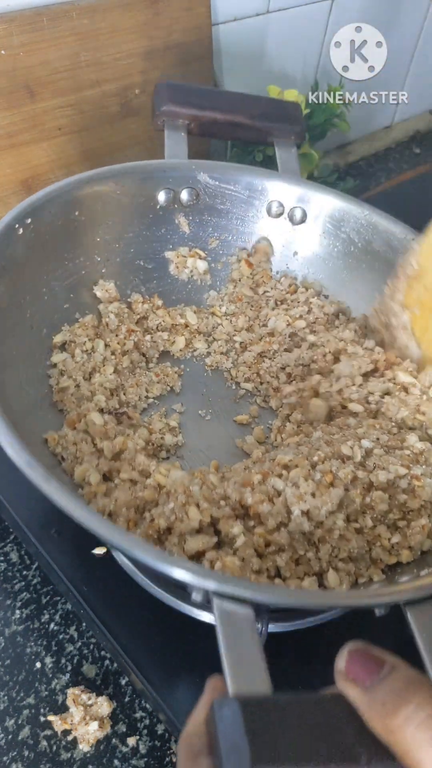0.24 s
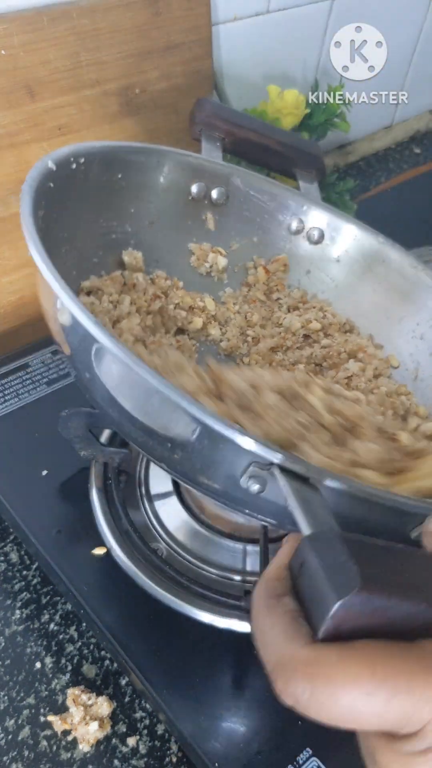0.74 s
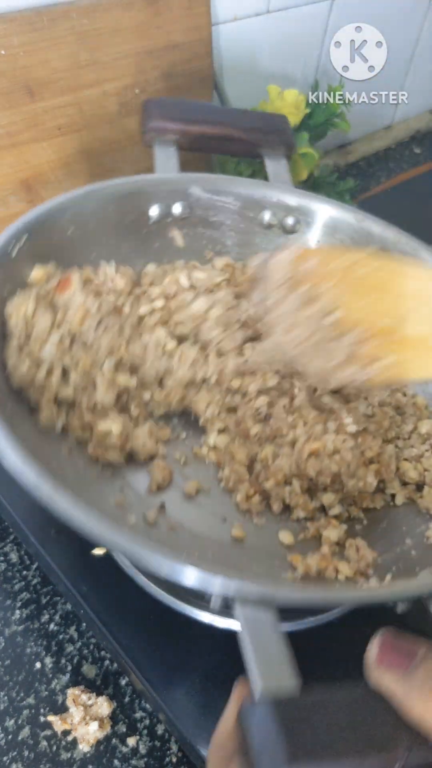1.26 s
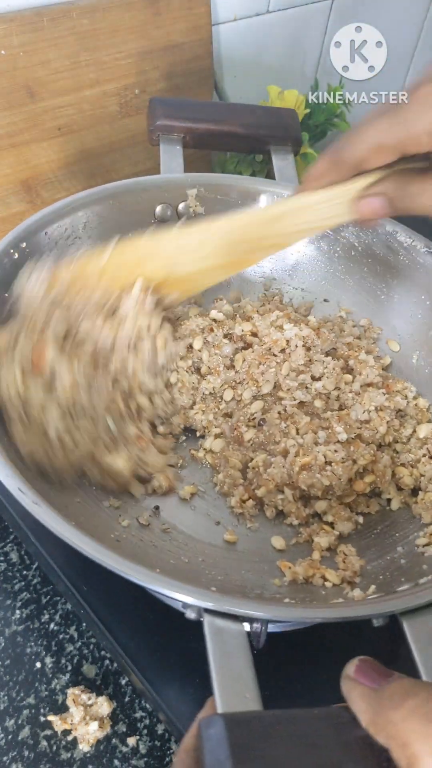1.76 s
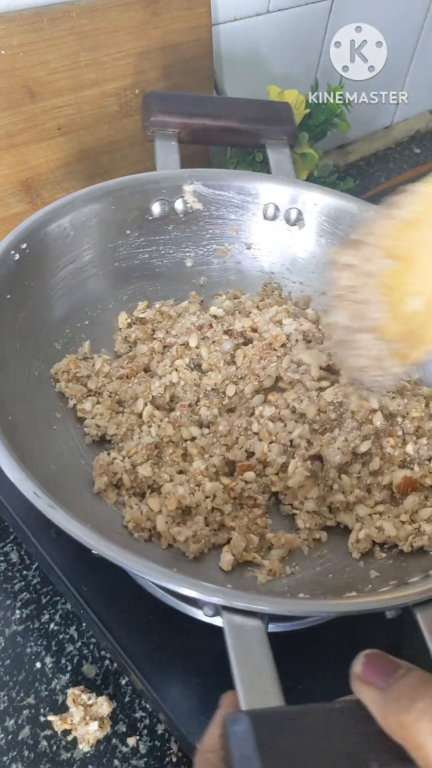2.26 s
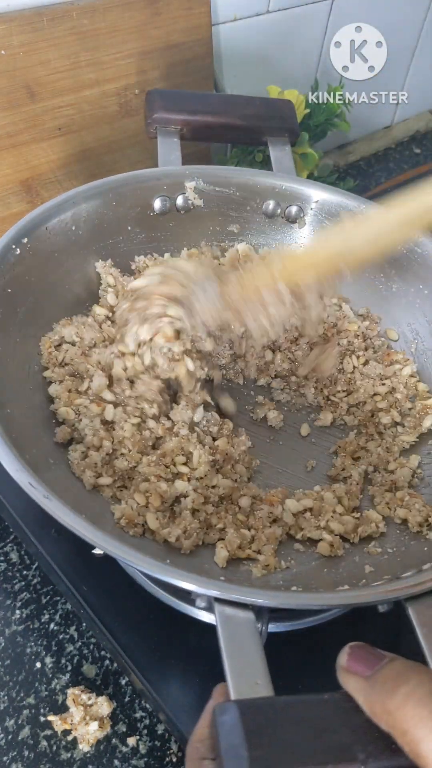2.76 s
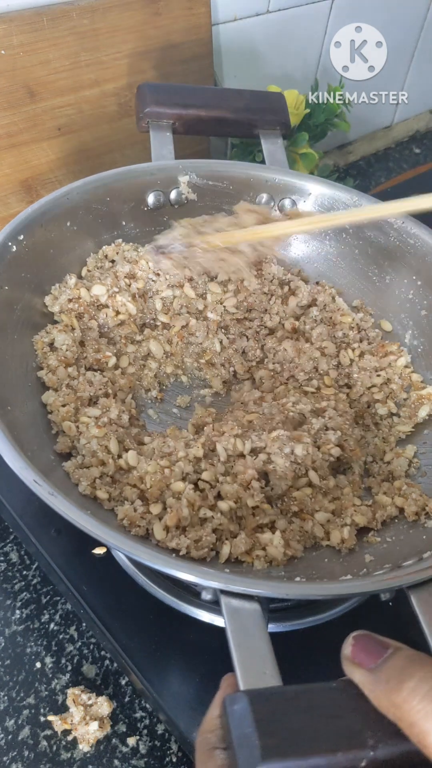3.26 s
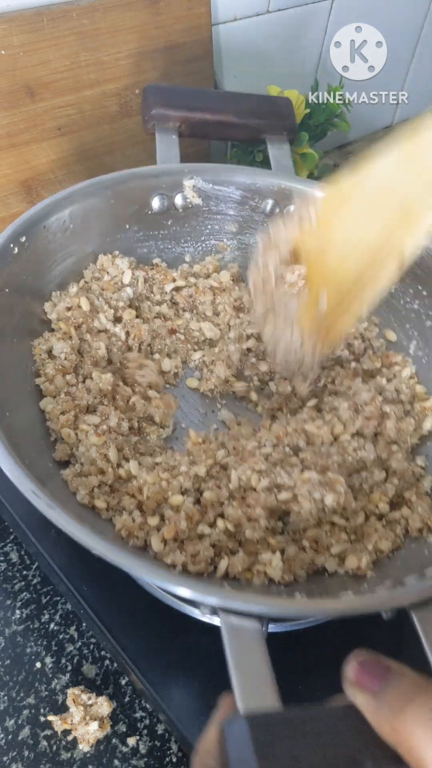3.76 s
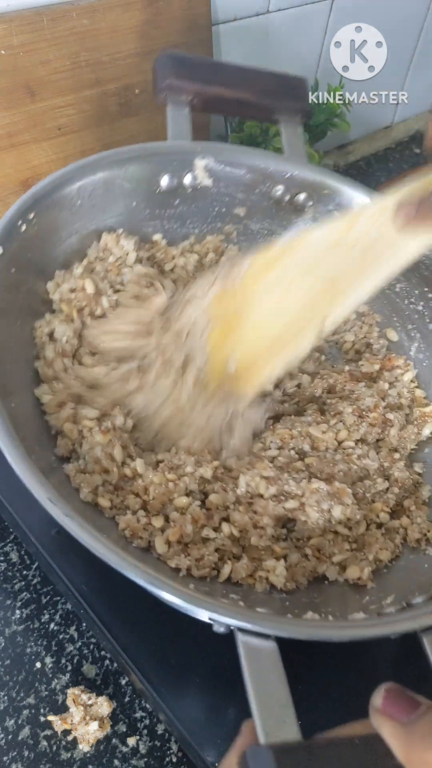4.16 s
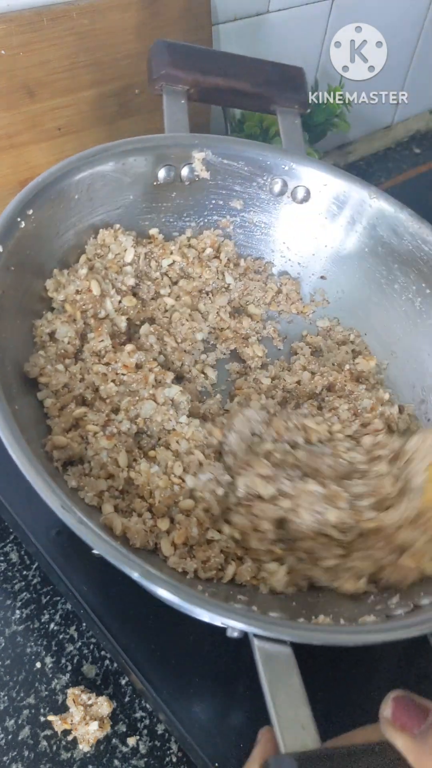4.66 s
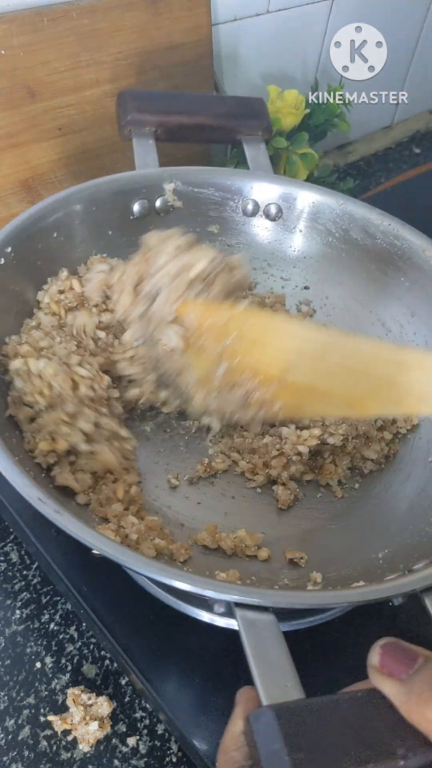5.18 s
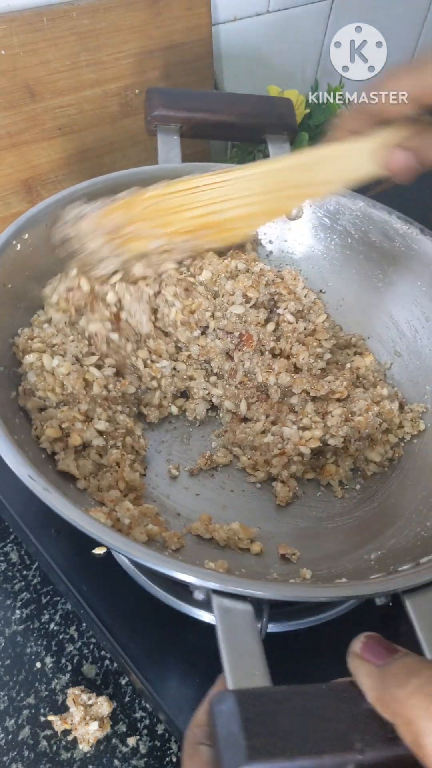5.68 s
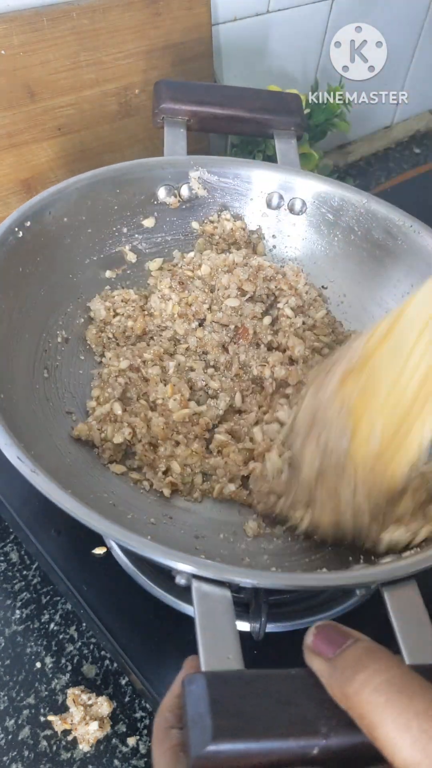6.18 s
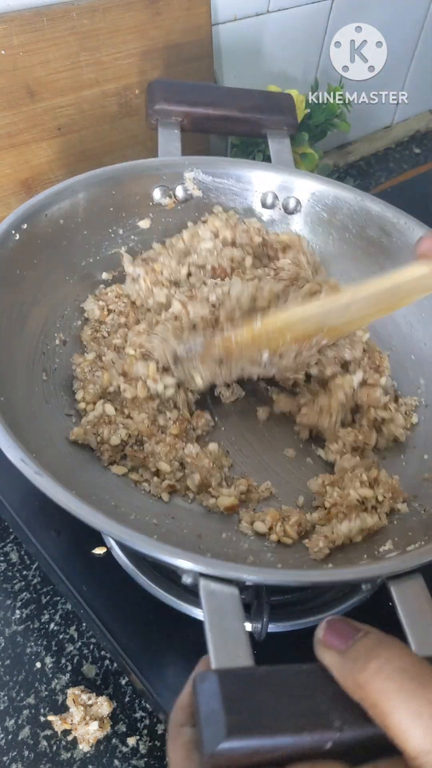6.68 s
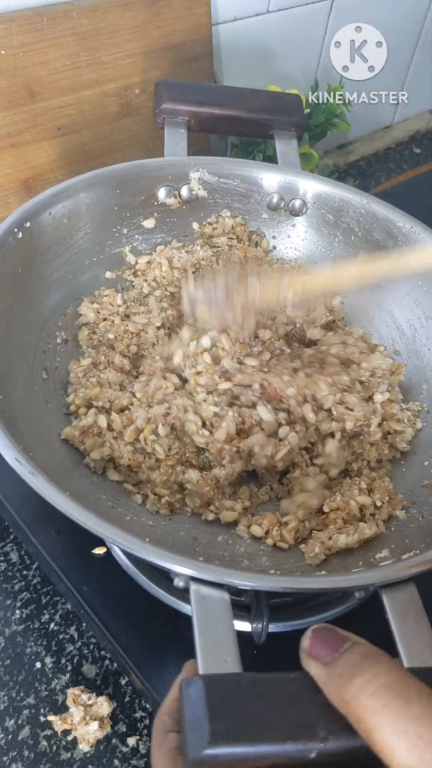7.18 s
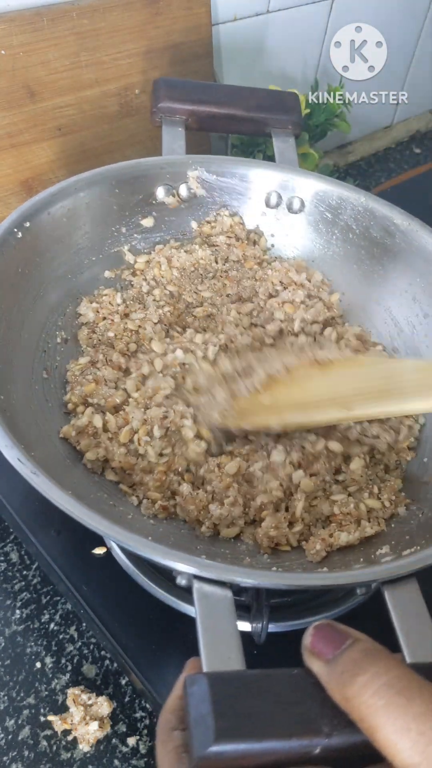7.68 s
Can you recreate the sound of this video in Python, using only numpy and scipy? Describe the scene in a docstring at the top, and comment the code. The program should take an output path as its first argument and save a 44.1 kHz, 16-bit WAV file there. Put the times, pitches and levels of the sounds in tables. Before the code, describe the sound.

A wooden spatula stirs a crumbly, sticky mixture in a steel pan, scraping and knocking as the pan clanks on the stove.

```python
"""Crumbs rustle and tick as a wooden spatula stirs a sticky mixture in a steel pan on a gas stove.
The pan clanks and rings on the burner grate, and the mixture tumbles once in a low patter.
The blade knocks, rocks the pan, sticks and squeaks on bare steel, and thumps once into the food.
Every stroke is a swarm of tiny contacts. A small tiled kitchen adds short echoes and a soft murmur."""
import sys
import numpy as np
from scipy import signal
from scipy.fft import rfft, irfft, next_fast_len
from scipy.io import wavfile
from scipy.ndimage import map_coordinates

SR = 44100
rng = np.random.default_rng(int(sys.argv[2]) if len(sys.argv) > 2 else 0)


def transcribe(signal):
    """Save signal, clipped to [-1, 1], as a 16-bit WAV file at the path in sys.argv[1]."""
    frames = np.atleast_2d(signal).T
    limited = np.clip(frames, -1, 1)
    pcm = np.round(limited * 32767).astype(np.int16)
    wavfile.write(sys.argv[1], SR, pcm)


N = 350154

# Blade strokes. Each row: start, speed-up and slow-down in seconds, crumb level and drag level in dB.
STROKES = [(0, 0.018, .08, -59, -47), (.04, .06, 0.037, -57, -46.5), (.1, 0.12, 0.34, -53, -78),
           (.35, 0.04, 0.28, -51, -63), (.64, 0.27, 0.13, -50.5, -60.5), (1.0, .15, 0.24, -55, -57.5),
           (1.6, 0.13, 0.21, -49.5, -67), (1.885, 0.08, 0.21, -47.5, -59), (2.029, 0.081, 0.14, -47, -58.5),
           (2.539, 0.078, 0.143, -46.5, -49.5), (2.99, 0.095, .04, -52, -55), (3.07, 0.096, 0.14, -46, -55),
           (3.23, 0.036, 0.2, -65, -51), (3.4, 0.075, .03, -55, -57), (3.48, 0.088, .19, -45, -44.5),
           (3.95, .05, 0.018, -61.5, -60), (4.122, 0.12, 0.08, -43, -48.5),
           (4.61, 0.061, 0.2, -50.5, -58.5), (4.819, 0.07, 0.16, -45.5, -52.5),
           (5.14, .12, 0.22, -57.5, -65), (5.625, 0.052, 0.79, -53, -62), (5.919, 0.18, 0.19, -46, -52.5),
           (6.29, 0.096, .01, -59, -53), (6.45, 0.034, 0.039, -66, -66.5), (6.62, .07, 0.11, -46, -47.5),
           (6.7, 0.11, 0.042, -45.5, -41), (7.06, .12, 0.09, -48.5, -51), (7.4, 0.036, .06, -49.5, -59),
           (7.545, 0.019, 0.06, -52.5, -72), (7.754, 0.021, 0.043, -46.5, -47),
           (7.79, 0.031, 0.23, -52, -49.5)]
# Blade edge and hard crumbs on steel. Each row: start in seconds, crack level and ring level in dB,
# favoured pitch in Hz.
TICKS = [(0.0461, -27.5, -29, 15300), (0.0589, -27.5, -29.5, 9100), (0.8236, -31, -44.5, 15330),
         (1.1622, -37, -50.5, 11300), (1.906, -42, -47, 15500), (2.4154, -28.5, -45.5, 15200),
         (2.831, -44, -52, 3720), (2.9876, -45.5, -59, 11300), (3.0858, -32.5, -42.5, 11200),
         (3.255, -32, -60, 11300), (3.5049, -30, -38.5, 11200), (3.6113, -31, -56, 11250),
         (3.7921, -35.5, -52.5, 3720), (3.8753, -42, -43, 11300), (4.5402, -28, -55, 8000),
         (4.999, -47, -51.5, 11300), (5.9818, -37, -50.5, 11300), (6.762, -35, -39.5, 15330),
         (7.1725, -19.5, -36.5, 11300), (7.4178, -39, -55, 8050), (7.4622, -29.5, -47, 11300)]
# Crumbs snapping. Each row: start in seconds, level in dB, pitch in Hz.
SNAPS = [(.047, -27, 9000), (.059, -25.5, 8950), (.824, -40, 2210), (2.326, -48, 3200),
         (2.416, -43.5, 8000), (2.842, -44, 6900), (5.239, -37.5, 4900), (5.259, -42, 3200),
         (6.383, -46.5, 11900), (7.043, -47, 4500), (7.608, -38, 7450), (7.616, -36, 5760)]
# Pan on grate. Each row: start in seconds, level in dB, then boom (bass), body (low mids) and
# edge (treble) in dB against that level, strongest note in Hz.
CLANKS = [(.428, -26.5, -27.5, -13.5, -7, 1135), (.44, -31.5, -23.5, -5.5, 0.5, 143),
          (1.457, -18, -24, -12, 0.5, 2600), (1.472, -25.5, -12.5, -5, 0.5, 356),
          (1.578, -34, -13, -3, -10.5, 755), (3.606, -43.5, 1.5, -12, -2, 1020)]
# Blade on pan. Each row: start in seconds, level in dB, body and edge in dB against it, note in Hz.
KNOCKS = [(1.711, -39.5, 0.5, -24.5, 684), (1.732, -36, -1.5, -41, 940), (2.326, -44, -11, -23, 1290),
          (2.338, -47, -17, -25, 676), (2.445, -35.5, -2, -9, 840), (2.448, -38.5, -5, -15, 2540),
          (2.645, -49.5, 2, -12, 473), (3.086, -47, -9, 3.5, 945), (3.496, -44.5, -19, -4, 880),
          (3.517, -38, -10, -19, 664), (3.622, -33, -9.5, -20, 960), (3.675, -43, -1, -13, 555),
          (3.873, -39, -6, -6.5, 2100), (3.877, -42, -4.5, -12, 514), (4.228, -36, -17, 0, 2780),
          (4.26, -44.5, -3.5, -5, 1420), (4.54, -45, 4, -11.5, 215), (4.841, -36.5, -4.5, -21.5, 554),
          (4.843, -41, -13, -22, 1220), (5.29, -34, -3, -19, 710), (5.294, -25, -4, -4, 846),
          (6.784, -44.5, -2, -1, 1130), (6.801, -39, -3.5, -5, 1130), (6.92, -46.5, -13, -29.5, 764),
          (6.963, -41, -6, -35, 950), (7.062, -47.5, -7, -0.5, 1480), (7.103, -40.5, -7, -17, 734),
          (7.133, -37, -8, -12, 603), (7.22, -32.5, -8, -16, 906), (7.445, -44.5, -13, -2, 1390)]
# Pushes that tip the pan. Each row: start in seconds, level in dB.
ROCKS = [(2.646, -55), (4.929, -49.5), (5.296, -39.5), (6.965, -53), (7.1, -56), (7.22, -46.5),
         (7.446, -50.5)]
# Blade squeaks. Each row: start and length in seconds, first and last pitch in Hz, level in dB.
SQUEAKS = [(2.848, 0.02, 1520, 1440, -46.5), (3.313, 0.13, 1095, 1040, -56),
           (3.35, 0.164, 2160, 2000, -60.5), (3.788, 0.018, 3790, 3580, -46),
           (4.222, 0.052, 2850, 2806, -37.5), (4.234, 0.083, 1440, 1414, -44.5)]

# Ringing modes. Each row: pitch in Hz, relative level in dB, time to fade 60 dB in seconds.
STEEL_MODES = [(2690, -19.5, 0.094), (3500, -28, 0.12), (4950, -14.5, 0.12), (7020, -8.5, 0.05),
               (7830, -10.5, 0.15), (9200, -5, 0.077), (11030, -8, 0.089), (11480, -6.5, 0.13),
               (14700, -7, 0.11)]  # thin and high
PAN_MODES = [(87.2, 7.5, 0.83), (139.9, -0.5, 0.5), (345, -7, 0.5), (394, -11, 0.26), (469, -4, 0.44),
             (578, -15.5, 0.48), (688.6, -10.5, 0.44), (786, -10, 0.45), (905, -12, 0.22), (1137, -7, 0.32),
             (1339, -12, 0.31), (1524, -8.5, 0.27), (1614, -11.5, 0.3), (1670, -24, 0.35), (2077, -9, 0.28),
             (2227, -17.5, 0.49), (2603, -9.5, 0.16), (2810, -10, 0.25), (4880, -9.5, 0.21),
             (6110, -12, 0.3)]  # pan and stove together
# Tone colours for noise. Each row: frequency in Hz, relative level in dB.
AIR_EQ = [(15, -43.5), (25, -29.5), (97, 1.5), (277, -12.5), (344, -1), (796, -11), (1190, -15.5),
          (1480, -12), (1650, -24.5), (2480, -21), (3080, -25.5), (7110, -26), (12500, -37), (14800, -39),
          (16000, -33.5)]
CRUMB_EQ = [(500, -30.5), (1200, -1.5), (2400, 0), (3500, -0.5), (5500, -1.5), (8000, -3), (11000, -6.5),
            (15500, -13)]
DRAG_EQ = [(120, -32.5), (260, 8), (500, 1.5), (900, 5), (1500, -5), (2500, -3.5), (5000, -26.5)]
TICK_EQ = [(400, -3), (2000, 0), (4000, 8), (8500, 7.5), (13000, -2.5), (16000, -6.5)]
CLATTER_EQ = [(55, -22.5), (85, 14), (150, 2), (195, -13.5), (250, 6), (620, 2.5), (800, 3.5), (1400, 2),
              (2600, -4), (3400, -9), (4600, -10.5), (7000, -15.5), (16000, -27)]
TUMBLE_EQ = [(30, -37), (80, -2), (150, -6.5), (260, -6), (450, -11.5), (900, -32), (2500, -57.5)]
# The tail of a blow. Each row: frequency in Hz, time to fade 60 dB in seconds.
CLATTER_T60 = [(90, .5), (350, 0.43), (900, 0.37), (2000, 0.42), (5000, 0.28), (14000, 0.35)]
# Stereo width. Each row: frequency in Hz, likeness of left and right from 0 (unrelated) to 1 (same).
STEREO_LIKENESS = [(60, 1), (130, 0.85), (290, 0.75), (640, 0.59), (1410, 0), (3100, 0)]
# Stereo placement. Each row: frequency in Hz, right over left in dB.
STIR_SIDE = [(100, 3.5), (400, 3.5), (1300, 3.5), (4400, 5), (8100, 8), (15000, 12.5)]
CLANK_SIDE = [(100, 1.5), (700, 4), (1500, 0.5), (4400, 3.5), (9000, 5)]
KNOCK_SIDE = [(100, 4), (300, 2), (700, 4.5), (1500, 2), (4400, 3), (9000, 6.5)]


def amp(db):
    """Decibels to gain."""
    return 10 ** (np.asarray(db) / 20)


def unit(x):
    """Scale to rms 1."""
    return x / np.sqrt(np.mean(x ** 2) + 1e-20)


def along(points, hz):
    """Read (Hz, value) points on a log frequency axis."""
    freqs, values = np.transpose(points)
    return np.interp(np.log(hz + 1), np.log(freqs + 1), values)


def wobble(rate):
    """A smooth random curve, rate knots a second."""
    return map_coordinates(rng.standard_normal(int(N * rate / SR) + 4), [np.arange(N) * rate / SR])


def add(track, s, sound):
    """Mix a sound into the track at s seconds."""
    part = track[:, max(round(s * SR), 0):][:, :sound.shape[1]]
    part += sound[:, :part.shape[1]]


def spread(pair, eq, side):
    """Colour two unrelated signals and place them in stereo: bass narrow, treble wide, rms 1."""
    n = pair.shape[1]
    size = next_fast_len(n)
    hz = np.fft.rfftfreq(size, 1 / SR)
    a, b = rfft(pair, size) * amp(along(eq, hz))
    width = np.arccos(along(STEREO_LIKENESS, hz)) / 2
    centre, wide = a * np.cos(width), b * np.sin(width)
    lean = amp(along(side, hz) / 2)
    return unit(irfft(np.array([(centre + wide) / lean, (centre - wide) * lean]), size)[:, :n])


def grains(rate, scatter_db):
    """Two streams of tiny random contacts of uneven size, each about rate a second."""
    size = amp(scatter_db * np.clip(rng.standard_normal((2, N)), -2, 2)) * rng.uniform(-1.08, 1, (2, N))
    return size * (rng.random((2, N)) < rate / SR)


def gesture(rise_s, fall_s, swell_db, bite_s=0.025, lift_db_per_s=151):
    """Gain of one movement: it bites in, swells to its fastest moment, slows and dies away."""
    t = np.arange(SR) / SR
    slowness = np.interp(t, [0, rise_s, rise_s + fall_s], [1, 0, 1])
    lifted_s = np.maximum(t - rise_s - fall_s, 0)
    return np.clip(t / bite_s, 0, 1) * amp(-swell_db * slowness - lift_db_per_s * lifted_s)[None]


def echo(x, t60):
    """A short diffuse answer from tiles or pan walls, different left and right."""
    t = np.arange(SR // 3) / SR
    tail = rng.standard_normal((2, len(t))) * amp(-60 * t / t60)
    return signal.fftconvolve(x, tail / np.linalg.norm(tail[0]), axes=1)[:, :N]


def ring(modes, t, side, scatter_db, blur_hz):
    """Decaying modes, at new strengths for every blow and blurred by the food; high ones sound wide."""
    out = np.zeros((2, len(t)))
    for hz, db, t60 in modes:
        stereo_phase = np.arccos(along(STEREO_LIKENESS, hz)) * rng.standard_normal((2, 1)) * 0.81
        lean = amp(along(side, hz) / 2 * np.array([[-1], [1]]))
        drift = np.cumsum(rng.standard_normal(len(t))) * np.sqrt(2 * np.pi * blur_hz / SR)
        phase = 2 * np.pi * (hz * t + rng.random()) + stereo_phase + drift
        out += lean * amp(db + scatter_db * rng.standard_normal() - 60 * t / t60) * np.sin(phase)
    return out


def hollow(pitch_hz, t60, sharpness, side):
    """The broad note that a blow favours: a decaying band of noise, narrower as sharpness rises."""
    t = np.arange(SR // 3) / SR
    hz = pitch_hz * np.geomspace(1 / 16, 16, 161)
    detune = sharpness * (hz / pitch_hz - pitch_hz / hz) / 2
    hump = np.column_stack([hz, -20 * np.log10(1 + detune ** 2)])
    note = spread(rng.standard_normal((2, len(t))), hump, side)
    return note * amp(-60 * t / t60) * (1 - np.exp(-t * pitch_hz))


def room_tone(level_db=-57):
    """The steady low murmur of the kitchen's air."""
    gain = amp(level_db + 0.29 * wobble(12))
    return gain * spread(rng.standard_normal((2, N)), AIR_EQ, side=[(100, 2.1), (8000, 5.8)])


def stirring(crumb_rest_db=-73.5, drag_rest_db=-65.5):
    """Crumbs rustle ahead of the blade while the wood drags over the steel in tiny slips."""
    rustle_power = np.full((1, N), amp(crumb_rest_db) ** 2)
    drag_power = np.full((1, N), amp(drag_rest_db) ** 2)
    for s, rise_s, fall_s, crumb_db, drag_db in STROKES:
        add(rustle_power, s, (amp(crumb_db) * gesture(rise_s, fall_s, swell_db=9)) ** 2)
        add(drag_power, s, (amp(drag_db) * gesture(rise_s, fall_s, swell_db=13.5)) ** 2)
    pressure = wobble(28)
    crumbs = grains(rate=5000, scatter_db=4.5)
    # each contact rings briefly in the bowl, with a colour that changes as the blade travels
    nearness = np.array([wobble(9) for spot in range(6)])
    nearness /= np.linalg.norm(nearness, axis=0)
    bowl = sum(share * echo(crumbs, t60=0.066) for share in nearness)
    rustle = amp(-0.4 * pressure) * spread(crumbs + amp(-1) * bowl, CRUMB_EQ, STIR_SIDE)
    drag = amp(1.8 * pressure) * spread(grains(rate=2500, scatter_db=3.5), DRAG_EQ, STIR_SIDE)
    return np.sqrt(rustle_power) * rustle + np.sqrt(drag_power) * drag


def ticks(crack_t60=0.051, tail_t60=0.42, favour_db=7, attack_s=0.00041):
    """Small hard contacts: a gritty crack, its echo off the tiles and the high, damped ring of steel."""
    out, t = np.zeros((2, N)), np.arange(SR // 4) / SR
    fade = amp(-12 - 60 * t / crack_t60) + amp(-20 - 60 * t / tail_t60)
    for s, crack_db, ring_db, pitch_hz in TICKS:
        crack = amp(crack_db) * fade * spread(rng.standard_normal((2, len(t))), TICK_EQ, STIR_SIDE)
        modes = [(hz, db + favour_db * np.exp(-(10 * np.log(hz / pitch_hz)) ** 2), t60)
                 for hz, db, t60 in STEEL_MODES]
        shimmer = amp(ring_db) * ring(modes, t, STIR_SIDE, scatter_db=2, blur_hz=260)
        add(out, s, (crack + shimmer) * (1 - np.exp(-t / attack_s)))
    return out


def snaps():
    """Tiny dry clicks of the sticky mixture, with a little echo off the tiles."""
    out = np.zeros((2, N))
    for s, db, pitch_hz in SNAPS:
        add(out, s, amp(db) * hollow(pitch_hz, t60=0.024, sharpness=3.4, side=STIR_SIDE))
    return out + amp(-9) * echo(out, t60=0.2)


def blow(boom, body, edge, side, burst_db, burst_t60, tail_db, modes_db, attack_s):
    """One hit on the pan: a dense burst, the kitchen's echo and the ring of pan and stove."""
    t = np.arange(SR * 4 // 5) / SR
    octave = np.log2(np.fft.rfftfreq(len(t), 1 / SR) + 1)
    force_eq = [(44, boom - 30), (88, boom - 1), (176, body - 8), (350, body), (700, -2.5),
                (1400, -3), (2800, edge / 2 - 2.5), (5600, edge), (11200, edge - 6)]
    clatter = rfft(spread(rng.standard_normal((2, len(t))), CLATTER_EQ, side))
    out = np.zeros((2, len(t)))
    for hz in np.geomspace(44, 11264, 9):  # octave bands
        window = np.sqrt(np.clip(1 - abs(octave - np.log2(hz)), 0, 1))
        band = unit(irfft(clatter * window, len(t)))
        fade = amp(tail_db - 60 * t / along(CLATTER_T60, hz)) + amp(burst_db - 60 * t / burst_t60)
        swell = 1 - np.exp(-t / (attack_s + 0.5 / hz))  # low bands take longer to build up
        out += amp(along(force_eq, hz)) * band * fade * swell
    modes = [(hz, db + along(force_eq, hz), t60) for hz, db, t60 in PAN_MODES]
    ringing = ring(modes, t, side, scatter_db=2, blur_hz=1.2) * (1 - np.exp(-t / 0.008))
    return out + amp(modes_db) * ringing


def clanks():
    """The steel pan meets the iron grate: hard, bright and ringing."""
    out = np.zeros((2, N))
    for s, db, boom, body, edge, note_hz in CLANKS:
        hit = blow(boom, body, edge, CLANK_SIDE,
                   burst_db=-7, burst_t60=0.075, tail_db=-4, modes_db=0.5, attack_s=0.00068)
        note = hollow(note_hz, t60=along(CLATTER_T60, note_hz), sharpness=11, side=CLANK_SIDE)
        add(out, s, amp(db) * hit)
        add(out, s, amp(db - 5) * note)
    return out


def tumble(start_s=0.96, level_db=-44.5):
    """Soft clumps fall back once on the floor of the lifted pan in a low, dense patter."""
    gain = np.zeros((1, N))
    add(gain, start_s, amp(level_db) * gesture(rise_s=0.19, fall_s=0.21, swell_db=13.5))
    return gain * spread(grains(rate=2500, scatter_db=1.5), TUMBLE_EQ, STIR_SIDE)


def knocks():
    """Wood meets the loaded pan: a short blow with a hollow note that starts as a broad slap."""
    out = np.zeros((2, N))
    for s, db, body, edge, note_hz in KNOCKS:
        boom = body - 15.5  # a heavier knock rocks the pan harder on its grate
        hit = blow(boom, body, edge, KNOCK_SIDE,
                   burst_db=-6, burst_t60=0.036, tail_db=-7.5, modes_db=-2, attack_s=0.00047)
        note = hollow(note_hz, t60=0.15, sharpness=14.6, side=KNOCK_SIDE)
        slap = hollow(note_hz, t60=0.028, sharpness=4.6, side=KNOCK_SIDE)
        add(out, s, amp(db) * hit)
        add(out, s, amp(db + 1) * note + amp(db - 1) * slap)
    return out


def rocking(attack_s=0.0089):
    """The blade tips the pan softly on its grate: the two lowest modes hum without a clack."""
    out, t = np.zeros((2, N)), np.arange(SR) / SR
    lowest = [(hz, db - PAN_MODES[0][1], t60) for hz, db, t60 in PAN_MODES[:2]]
    for s, db in ROCKS:
        hum = ring(lowest, t, KNOCK_SIDE, scatter_db=1.5, blur_hz=1)
        add(out, s, amp(db) * hum * (1 - np.exp(-t / attack_s)))
    return out


def squeaks(jitter=0.015):
    """The blade sticks and slips on bare steel: brief, unsteady falling tones with kitchen echo."""
    out, waver = np.zeros((2, N)), wobble(250)
    lean_right = amp([[-2], [2]])
    for s, length_s, start_hz, end_hz, db in SQUEAKS:
        progress = np.linspace(0, 1, int(length_s * SR))
        glide_hz = start_hz + (end_hz - start_hz) * progress
        hz = glide_hz * (1 + jitter * waver[int(s * SR):][:len(progress)])
        tone = np.sin(2 * np.pi * np.cumsum(hz) / SR)
        add(out, s, amp(db) * np.sin(np.pi * progress) * tone * lean_right)
    return out + amp(-6) * echo(out, t60=0.38)


def thump(start_s=4.9, level_db=-35.5):
    """The blade lands flat on the cushion of food: one low, dull push."""
    out = np.zeros((2, N))
    add(out, start_s, amp(level_db) * hollow(pitch_hz=244, t60=0.15, sharpness=2.2, side=KNOCK_SIDE))
    return out


def scene():
    """Everything that sounds around the stove, in stereo."""
    return (room_tone() + stirring() + ticks() + snaps() + clanks()
            + tumble() + knocks() + rocking() + squeaks() + thump())


def record(dry, ceiling=0.85, top_hz=15750):
    """Round off the highest peaks and cut the very top of the treble."""
    rounded = dry / (1 + abs(dry / ceiling) ** 6) ** (1 / 6)
    size = next_fast_len(N + SR // 4)
    passband = np.fft.rfftfreq(size, 1 / SR) < top_hz
    return irfft(rfft(rounded, size) * passband, size)[:, :N]


dry = scene()
out = record(dry)
transcribe(out)
```